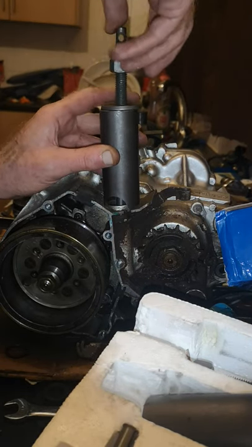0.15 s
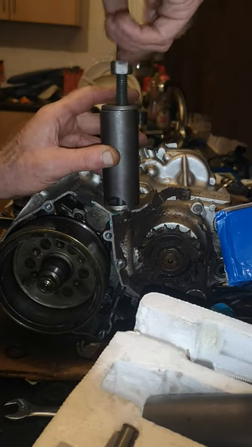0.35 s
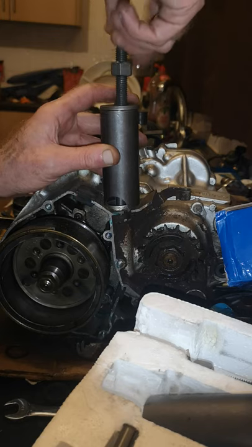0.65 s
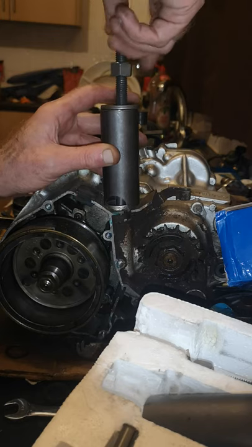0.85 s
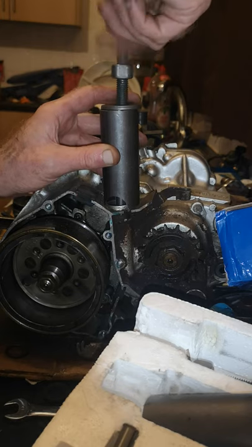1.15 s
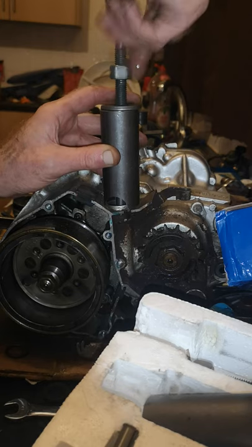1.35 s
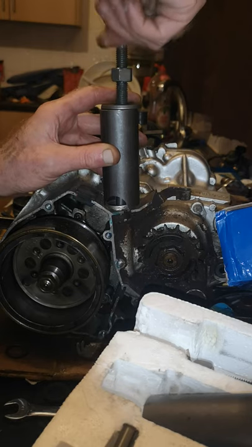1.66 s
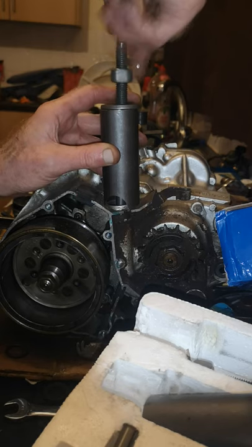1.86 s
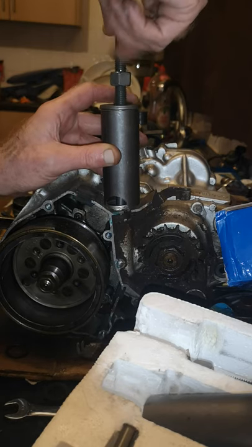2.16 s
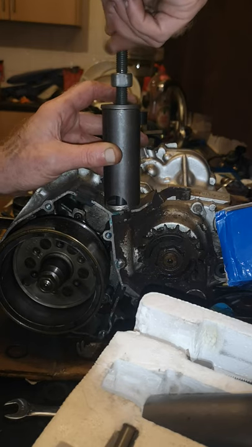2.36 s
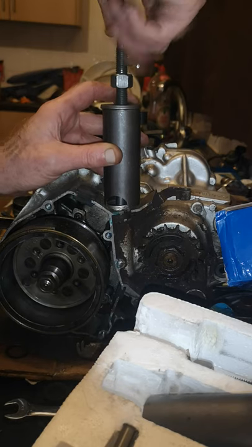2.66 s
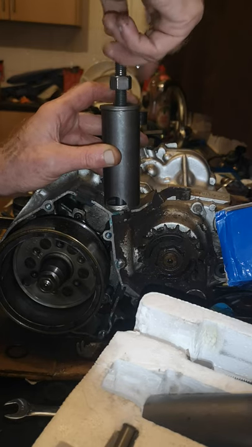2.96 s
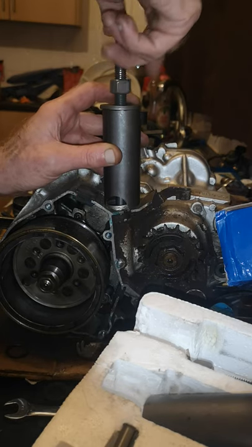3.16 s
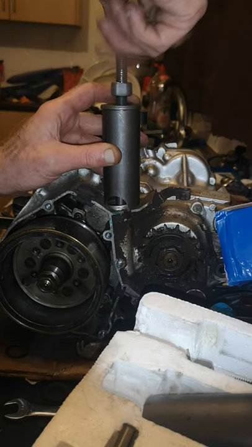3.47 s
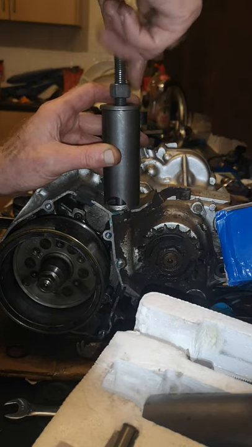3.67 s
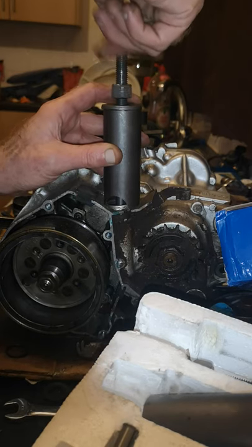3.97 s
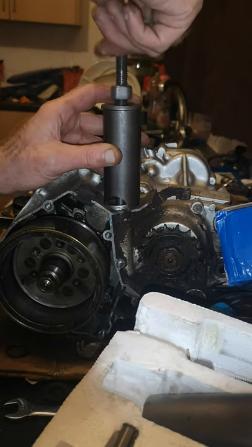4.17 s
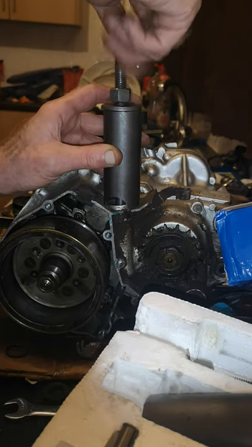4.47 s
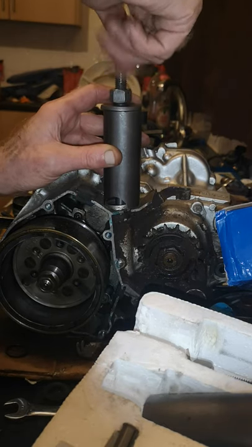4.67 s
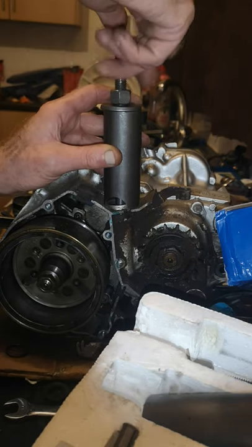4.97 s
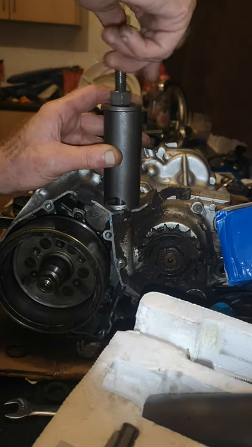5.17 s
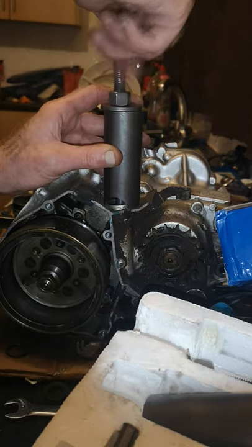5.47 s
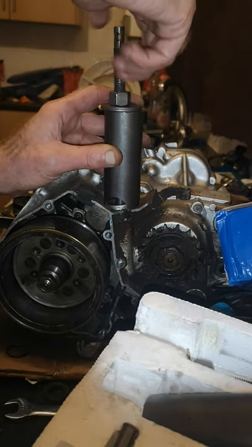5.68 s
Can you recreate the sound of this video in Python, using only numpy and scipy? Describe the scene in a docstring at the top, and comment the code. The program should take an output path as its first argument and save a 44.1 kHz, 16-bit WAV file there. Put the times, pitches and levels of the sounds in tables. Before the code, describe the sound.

Irregular bright metallic ticks, tiny rattles and short thread whirrs, with soft low thuds, in a small, faintly humming workshop.

```python
"""Bright steel knocks, rattles and whirrs on the right over a low rumble, in a small room with a faint hum:
a nut is flicked down the threaded bar of a puller that stands on an engine case in a workshop.
Contact forces made of tiny impacts excite resonances of nut, sleeve and bar; sliding thread whirrs.
Pushes of the hand shake bench and case as low resonances of noise; decaying noise makes the room's echo."""
import sys
import numpy as np
from scipy import signal
from scipy.fft import rfft, irfft, next_fast_len
from scipy.io import wavfile
from scipy.ndimage import uniform_filter1d

SR = 44100
rng = np.random.default_rng(int(sys.argv[2]) if len(sys.argv) > 2 else 0)


def transcribe(u):
    """Save the signal u as a 16-bit wav file named by the first command-line argument.

    u: samples, shape (n,) or (channels, n), limited to [-1, 1]; the rate is SR.
    q: integer samples, one column per channel.
    """
    v = np.clip(np.atleast_2d(u).T, -1, 1)
    q = np.round(v * 32767).astype(np.int16)
    wavfile.write(sys.argv[1], SR, q)


N = 256662
TIME = np.arange(N) / SR


def knocks(rise_s=0.00044, settle_s=0.0021, level_db=2):
    """Impact excitation: the nut meets a thread flank and settles in milliseconds of micro-bounces."""
    # knocks of the nut; the angle of the contact decides what rings; levels before the trims below
    # columns: start_s, click_db, then relative to the click: sleeve_db, bar_db, ping_db (of the nut)
    knock_table = [(0.1118, -50.5, -15, -19, -9), (0.1445, -29.5, -8, -18, 2),
                   (0.239, -41.5, -8, 1.5, -8.5), (0.6055, -47.5, -1.5, -2.5, -13),
                   (0.82, -37, -8, -8.5, 0.5), (1.034, -62.5, -1, 4, -17), (1.262, -51.5, -5, 5, -14),
                   (1.3024, -43, -6.5, -26, -2.5), (1.483, -36.5, -27, -12, -2),
                   (1.5093, -38, -4.5, -7, -8), (1.7223, -24, -37, -5.5, -4), (1.8731, -45.5, -3, -24, -4),
                   (1.9714, -30, -12, -4.5, -8), (2.024, -36, -22, -10, -11), (2.049, -32, -19, 1.5, -6),
                   (2.203, -41.5, -1.5, 0.5, -17), (2.4308, -40.5, -5.5, -2, -9),
                   (2.505, -43, -6, -4, -10.5), (2.7015, -41, -15, -23, -16), (2.7255, -39, -32, -15, -9),
                   (2.911, -45.5, -8, -8, -9), (2.926, -29.5, -17, -20, -11), (2.938, -32, -2, -5.5, -7),
                   (3.1428, -52.5, -3, 3, -23), (3.1775, -32, -6, -26, -4.5), (3.272, -48.5, -23, -7, -11),
                   (3.2832, -45.5, -12, 0, -23), (3.3876, -43.5, 3, -5, -10), (3.5826, -43, -18, -21, -18),
                   (3.6032, -40.5, -7, -15, -1.5), (3.8387, -32.5, -6.5, -6.5, -3),
                   (4.0379, -35.5, -12.5, -6.5, -11), (4.0586, -32.5, -9, -7.5, -13),
                   (4.0744, -40, -2, -11, -3), (4.2944, -32.5, -6.5, -18, -9.5), (4.4963, -49, -6, -6, -9),
                   (4.7426, -44, -0.5, -5.5, -9), (4.9254, -48.5, -7, -2.5, -21),
                   (5.176, -44.5, -2.5, -8, -6), (5.2014, -38, -3, -12, -5), (5.3745, -44, -19, -0.5, -15),
                   (5.5844, -37.5, -14.5, -7, -11), (5.6372, -42, -3, -7, -4.5),
                   (5.743, -56, 2.5, 3.5, -14)]
    sleeve_trim_db, bar_trim_db, ping_trim_db, crack_db = 2, 1, 2, -34
    out, t = np.zeros(N), TIME[:SR // 8]
    pressure = (1 - np.exp(-t / rise_s)) * np.exp(-t / settle_s)
    for start_s, click_db, sleeve_db, bar_db, ping_db in knock_table:
        force = grains(len(t), per_s=12000, spread_db=3) * pressure
        shares_db = np.array([0, sleeve_db + sleeve_trim_db, bar_db + bar_trim_db,
                              ping_db + ping_trim_db, crack_db])
        add(out, start_s, steel(force, click_db + shares_db, seconds=0.00037))
    return from_db(level_db) * out


def rattles(bar_db=-4, ping_db=-9, crack_db=-27, level_db=4):
    """Stick-slip chatter: under the finger the nut slips every few milliseconds in a swelling, fading run."""
    # chatter on the thread; levels before level_db, half length as the deviation of a bell curve
    # columns: centre_s, half_length_s, click_db, sleeve_db (relative to the click)
    rattle_table = [(0.457, 0.027, -54.5, -3), (1.085, 0.012, -61.5, -14), (1.129, 0.011, -49, -11),
                    (1.307, .007, -59, -7), (1.527, .004, -53.5, 7), (1.557, 0.0057, -45, -10),
                    (1.772, .004, -30, -14.5), (2.056, 0.0086, -36.5, -10), (2.265, 0.013, -40, -8.5),
                    (2.484, 0.031, -57.5, 1.5), (2.675, 0.007, -68.5, 6.5), (2.711, 0.0094, -58.5, 10),
                    (2.933, .003, -52.5, 1.5), (3.173, 0.021, -61, 2), (3.296, 0.0089, -57, -0.5),
                    (3.402, 0.027, -58, 0), (3.663, 0.0088, -48, -3.5), (3.815, 0.0058, -63.5, 0),
                    (4.295, 0.0098, -55, 4), (4.541, 0.013, -61, 5.5), (4.588, 0.0031, -67.5, 12.5),
                    (4.713, 0.009, -62, 3), (4.956, 0.019, -57.5, 2), (5.16, 0.012, -66.5, 1),
                    (5.207, 0.007, -47.5, -6), (5.395, 0.0058, -73, 8.5), (5.61, .008, -56.5, 6.5)]
    out, t = np.zeros(N), TIME[:SR // 4]
    middle = t[-1] / 2
    for centre_s, half_s, click_db, sleeve_db in rattle_table:
        slips = np.cumsum(rng.uniform(.002, .009, 128)) - .01
        since_slip = t - slips[np.searchsorted(slips, t) - 1]
        swell = np.exp(-((t - middle) / half_s) ** 2 / 2)
        pressure = (.15 + np.exp(-since_slip / .0015)) * swell
        force = grains(len(t), per_s=5000, spread_db=0.0) * pressure
        shares_db = np.array([0, sleeve_db, bar_db, ping_db, crack_db])
        add(out, centre_s - middle, steel(force, click_db + shares_db, seconds=0.0069))
    return from_db(level_db) * out


def steel(force, levels_db, seconds, contact_hz=12400):
    """Modal excitation: one contact rings each group of modes to its own level; the grip detunes them."""
    # resonances of the steel parts before detuning; columns: pitch_hz, width_hz, level_db (within its group)
    click_modes = [(5240, 1220, -6.5), (6107, 263, 1.5), (6430, 104, 1.5), (7126, 470, -3.5),
                   (7850, 310, -1.5), (9400, 2900, -7.5), (10020, 250, -4), (11760, 93, -8.5)]
    # the sleeve; columns: pitch_hz, width_hz, level_db
    sleeve_modes = [(384, 250, -23.5), (750, 193, -14.5), (1080, 130, -11.5), (2244, 253, 0.5),
                    (2686, 330, 1), (2988, 350, -1.5), (4200, 680, -13.5), (4658, 37, 2.5)]
    # the threaded bar; columns: pitch_hz, width_hz, level_db
    bar_modes = [(4670, 26, -14.5), (5230, 140, -27), (5615, 182, -3), (5774, 95, 3.5), (5808, 118, -3)]
    # the ping of the nut; columns: pitch_hz, width_hz, level_db
    ping_modes = [(10810, 370, 0), (11180, 180, -4.5)]
    # the faint crack on top; columns: pitch_hz, width_hz, level_db
    crack_modes = [(12600, 700, 16), (14600, 530, -3)]
    groups = (click_modes, sleeve_modes, bar_modes, ping_modes, crack_modes)
    force = signal.sosfilt(signal.butter(6, contact_hz, fs=SR, output="sos"), force)
    detune = np.array([rng.uniform(.996, 1.004), 1, 1])   # pitch only
    parts = [resonate(force, detune * modes) for modes in groups]
    parts[-1] = signal.sosfilt(signal.butter(4, 12500, "high", fs=SR, output="sos"), parts[-1])
    # each level is the peak of a running rms
    return sum(from_db(db) * part / envelope(part, seconds).max() for part, db in zip(parts, levels_db))


def whirr(wobble_hz=45, glint_db=5):
    """Sliding friction: thread grit excites the free nut's modes, each flaring separately as it wobbles."""
    # free runs of the nut, bell-shaped in time; columns: centre_s, half_length_s, level_db
    run_table = [(0.174, 0.03, -47.5), (0.421, 0.015, -49.5), (0.56, 0.044, -61.5), (0.779, 0.027, -58),
                 (0.893, 0.019, -56), (1.094, 0.019, -56), (1.179, 0.011, -60), (1.766, 0.016, -46.5),
                 (1.869, 0.0066, -50.5), (1.997, 0.014, -46.5), (2.187, 0.0086, -48.5),
                 (2.23, 0.0055, -45.5), (2.405, 0.003, -58), (3.23, 0.009, -56)]
    # resonances of the free nut on its thread; columns: pitch_hz, width_hz, level_db
    thread_modes = [(1285, 440, -11), (2240, 220, -1.5), (2813, 120, 7), (3040, 130, -11),
                    (5600, 160, -5.5), (6140, 120, -16), (6600, 320, -24), (8000, 1400, -12.5),
                    (9730, 130, -9), (11300, 210, -9)]
    speed = sum(from_db(db) * np.exp(-((TIME - s) / half) ** 2 / 2) for s, half, db in run_table)
    grit = grains(N, per_s=800, spread_db=5)
    friction = 0
    for points in rng.standard_normal((len(thread_modes), SR // 20)):
        pass_index = 0 if np.isscalar(friction) else pass_index + 1
        wobble = np.interp(TIME * wobble_hz, np.arange(len(points)), points)
        friction = friction + resonate(grit * from_db(glint_db * wobble), [thread_modes[pass_index]])
    friction = signal.sosfilt(signal.butter(8, 12000, fs=SR, output="sos"), friction)
    return speed * friction / envelope(friction, 0.72)


def clanks():
    """Structure-borne impulse: a firmer flick passes down the puller and sets the engine case ringing."""
    # firmer flicks; columns: start_s, peak_db
    clank_table = [(1.768, -67), (2.708, -45), (2.938, -57), (3.178, -50.5), (4.06, -72)]
    # ringing of the engine case; columns: pitch_hz, width_hz, level_db
    ring_modes = [(750, 140, -12.5), (1004, 36, 7), (1200, 52, -1)]
    out, blow = np.zeros(N), resonate(signal.unit_impulse(SR // 4), ring_modes)
    for start_s, peak_db in clank_table:
        add(out, start_s, from_db(peak_db) * blow / np.abs(blow).max())
    return out


def thumps(hz=410, width_hz=210, decay_s=0.0068):
    """Damped resonance: a short, woolly burst of contact noise passes twice through one broad, low mode."""
    # a finger hits the nut squarely and the whole puller thumps on the case; columns: start_s, peak_db
    thump_table = [(1.723, -56), (1.771, -51), (1.972, -53), (2.205, -56.5), (2.69, -59), (4.039, -55)]
    out, t = np.zeros(N), TIME[:SR // 8]
    mode = [(hz, width_hz, 0)]
    for start_s, peak_db in thump_table:
        burst = rng.standard_normal(len(t)) * np.exp(-t / decay_s)
        thump = resonate(resonate(burst, mode), mode)
        add(out, start_s, from_db(peak_db) * thump / np.abs(thump).max())
    return out


def thuds(base_hz=172, width_hz=52, level_db=-1):
    """Soft impact: flesh rounds the attack and the case swings a few times, its pitch shifting with the grip."""
    # a fingertip lands on the bar and the case gives one round thud
    # columns: start_s, peak_db (before level_db)
    thud_table = [(0.117, -48), (0.468, -44.5), (1.306, -39), (1.548, -36.5), (1.781, -36), (1.974, -37.5),
                  (2.053, -38), (2.958, -43.5), (3.144, -42.5), (3.189, -44), (4.075, -39), (5.206, -36.5),
                  (5.388, -39)]
    out = np.zeros(N)
    for start_s, peak_db in thud_table:
        mode = [(base_hz * rng.uniform(0.939, 0.98), width_hz, 0)]
        swing = resonate(resonate(signal.unit_impulse(SR // 8), mode), mode)
        add(out, start_s, from_db(peak_db + level_db) * swing / np.abs(swing).max())
    return out


def handling(thud_side_db=-15, bench_lag_s=0.0081, right_lag_s=.0009):
    """Forced vibration: the hand rocks the bench and thuds on the case, heard first on the left."""
    # pushes of the hand; columns: start_s, hold_s, bench_rumble_db, case_thud_db
    push_table = [(0.006, 0.024, -48, -60), (0.111, 0.041, -35, -54), (0.232, 0.01, -54, -49.5),
                  (0.463, 0.021, -33.5, -52.5), (0.604, 0.019, -47, -58.5), (0.826, 0.01, -39.5, -54.5),
                  (0.925, 0.0082, -48, -58), (1.119, 0.034, -39.5, -52), (1.263, 0.073, -43, -52.5),
                  (1.394, 0.16, -43.5, -55), (1.544, 0.018, -29, -44), (1.618, 0.03, -35.5, -64),
                  (1.724, 0.098, -29.5, -46.5), (1.92, 0.032, -30.5, -58), (1.984, 0.08, -34.5, -48),
                  (2.198, 0.088, -39.5, -48), (2.457, 0.11, -35, -55), (2.684, 0.064, -33, -54),
                  (2.902, 0.045, -33, -50), (3.137, 0.057, -38.5, -51.5), (3.369, 0.057, -36, -48.5),
                  (3.598, 0.095, -48, -55.5), (3.825, 0.097, -31.5, -56), (4.044, 0.041, -35.5, -47),
                  (4.268, 0.065, -37.5, -49), (4.505, 0.054, -35.5, -52), (4.686, 0.061, -39.5, -51.5),
                  (4.928, 0.032, -40.5, -49.5), (5.165, 0.059, -39.5, -52.5), (5.391, 0.012, -42, -51.5),
                  (5.597, 0.081, -37, -54)]
    # slow rocking of the whole bench; columns: time_s, level_db
    rock_curve = [(0.0, -35.5), (0.11, -38), (1.15, -51), (1.93, -26), (2.24, -25.5), (2.48, -48.5),
                  (2.72, -33), (3.47, -38), (3.55, -63.5), (3.86, -35), (4.9, -32), (5.07, -49.5),
                  (5.22, -34.5), (5.82, -69)]
    # resonances of that rocking; columns: pitch_hz, width_hz, level_db
    rock_modes = [(15.93, 1.28, 4.5), (28.7, 5.9, -18)]
    # resonances of the bench; columns: pitch_hz, width_hz, level_db
    bench_modes = [(32.5, 12, -10.5), (46.8, 6.3, -1.5), (55.7, 20.2, -14.5)]
    # dull resonances of the engine case; columns: pitch_hz, width_hz, level_db
    case_modes = [(93, 32, -2), (130.5, 32.2, 3), (172.2, 24.6, 0.5), (200.3, 23.8, -2.5), (343, 74, -18),
                  (426, 100, -19), (685, 280, -21)]
    start_s, hold_s, bench_db, thud_db = np.transpose(push_table)
    # the light case answers a push at once; the heavy bench follows it and swings on longer
    bench_db = pushed(start_s + bench_lag_s, hold_s, bench_db,
                      rise_db_per_s=777, fall_db_per_s=127, rest_db=-58.5)
    thud_db = pushed(start_s, hold_s, thud_db, rise_db_per_s=604, fall_db_per_s=194, rest_db=-72)
    rock_db = np.interp(TIME, *np.transpose(rock_curve))
    rock = rumble(rock_modes, rock_db, even_s=0.11, top_hz=22.6)
    bench = rumble(bench_modes, bench_db, even_s=0.041, top_hz=80)
    thud = rumble(case_modes, thud_db, even_s=0.065, top_hz=875)
    scattered = rumble(case_modes, thud_db + thud_side_db, even_s=0.065, top_hz=875)
    common = rock + bench + thud + thuds()
    # opposite signs of the scattered part widen the sound
    return np.array([common + scattered, late(common - scattered, right_lag_s)])


def pushed(starts, holds, levels_db, rise_db_per_s, fall_db_per_s, rest_db):
    """Power summation: pushes rise to their start, hold and die away over the tremor of the resting hand."""
    power = from_db(rest_db) ** 2
    for start, hold, db in zip(starts, holds, levels_db):
        before = np.maximum(start - TIME, 0)
        after = np.maximum(TIME - start - hold, 0)
        power = power + from_db(db - rise_db_per_s * before - fall_db_per_s * after) ** 2
    return 10 * np.log10(power)


def rumble(modes, level_db, even_s, top_hz):
    """Random excitation: noise stirs heavy, dull modes, evened out and then as loud as the hand pushes."""
    body = resonate(rng.standard_normal(N + SR), modes)
    body = signal.sosfilt(signal.butter(2, top_hz, fs=SR, output="sos"), body)
    strength = envelope(np.abs(signal.hilbert(body)), even_s) / np.sqrt(2)
    steady = (body / strength)[SR // 2:SR // 2 + N]   # leaves out both ends
    return from_db(level_db) * steady


def room(x, turn_hz=0.6964):
    """Changing paths: the moving hand passes the sound in turn through three echoes of constant total power."""
    angles = 2 * np.pi * turn_hz * TIME + np.pi / 3 * np.arange(3)[:, None]
    shares = np.sqrt(2 / 3) * np.cos(angles)
    return sum(echo(x * share) for share in shares)


def echo(x, first_s=0.0009, split_hz=4500, t60_s=0.31, treble_t60_s=0.22, level_db=-5):
    """Diffuse reverberation: it builds up after the nearest surfaces answer; the treble dies sooner."""
    t, noise = TIME[:SR * 2 // 3], rng.standard_normal(SR * 2 // 3)
    low = signal.sosfiltfilt(signal.butter(2, split_hz, fs=SR, output="sos"), noise)
    tail = low * from_db(-60 * t / t60_s) + (noise - low) * from_db(-60 * t / treble_t60_s)
    tail = tail * (1 - np.exp(-(t / first_s) ** 2))
    tail = tail / np.sqrt(np.sum(tail ** 2))   # unit energy
    return from_db(level_db) * signal.fftconvolve(x, tail)[:N]


def workshop(shared_hz=900, air_db=-30):
    """Partly coherent noise: room air alike on both sides in the bass, mains hum, thin electric whine on the left."""
    # spectrum of the still air on the left, before air_db; columns: frequency_hz, level_db
    left_curve = [(25, -20), (50, -13), (80, -17.5), (170, -14.5), (300, -22.5), (480, -28), (750, -14),
                  (1080, -16), (1400, -28), (1750, -17.5), (2300, -26.5), (3500, -35.5), (6000, -43.5),
                  (10000, -48), (15000, -46.5)]
    # the same on the right; columns: frequency_hz, level_db
    right_curve = [(25, -12), (50, -9), (80, -19.5), (170, -15), (300, -25), (480, -30.5), (750, -21),
                   (1080, -28), (1400, -31.5), (1750, -25.5), (2300, -36.5), (3500, -39), (6000, -44),
                   (10000, -46), (15000, -49)]
    hum_hz, hum_db, whine_hz, whine_db = 101.5, -62, 7700, -83.5   # rms levels
    low_pass = signal.butter(1, shared_hz, fs=SR, output="sos")
    high_pass = signal.butter(1, shared_hz, "high", fs=SR, output="sos")
    shared = signal.sosfilt(low_pass, rng.standard_normal(N))
    air = shared + signal.sosfilt(high_pass, rng.standard_normal((2, N)))
    hum = from_db(hum_db) * np.sqrt(2) * np.sin(2 * np.pi * hum_hz * TIME)
    whine = from_db(whine_db) * np.sqrt(2) * np.sin(2 * np.pi * whine_hz * TIME)
    left = from_db(air_db) * colour(air[0], left_curve) + whine
    right = from_db(air_db) * colour(air[1], right_curve)
    return np.array([left, right]) + hum


def from_db(db):
    """Logarithmic level: decibels to amplitude gain."""
    return 10 ** (np.asarray(db) / 20)


def envelope(x, seconds):
    """Short-time power: running rms."""
    return np.sqrt(np.abs(uniform_filter1d(x * x, max(int(seconds * SR), 1))) + 1e-20)


def colour(x, points):
    """Spectral shaping: filter by a curve of (frequency_hz, level_db), joined along log frequency."""
    hz, db = np.transpose(points)
    size = next_fast_len(N + 4096)
    bins = np.maximum(np.arange(size // 2 + 1) * SR / size, 1)
    gain = from_db(np.interp(np.log(bins), np.log(hz), db))
    return irfft(rfft(x, size) * gain, size)[..., :N]


def resonate(force, modes):
    """Modal synthesis: parallel damped resonances of alternating sign."""
    out = 0
    for k, (hz, width, db) in enumerate(modes):
        r = np.exp(-np.pi * width / SR)
        poles = [1, -2 * r * np.cos(2 * np.pi * hz / SR), r * r]
        gain = (-1) ** k * from_db(db) * (1 - r * r) / 2
        out = out + gain * signal.lfilter([1, 0, -1], poles, force + 1e-18)
    return out


def grains(size, per_s, spread_db):
    """Random pulse train: tiny impacts of either sign at random moments, their strengths spread in dB."""
    hits = rng.random(size) < per_s / SR
    return hits * rng.choice([-1, 1], size) * from_db(spread_db * rng.standard_normal(size))


def add(track, start, sound):
    """Superposition: mix a sound in at a given time."""
    at = max(round(start * SR), 0)
    track[at:at + len(sound)] += sound[:N - at]


def late(x, seconds):
    """Propagation delay: the same sound a little later."""
    return np.interp(TIME - seconds, TIME, x)


def scene(left_lag_s=.000567):
    """Interaural cues: bright steel mostly on the right, rumble near the middle, the room all round."""
    # the tool stands to the right: its direct sound on the left; columns: frequency_hz, level_db
    shadow_curve = [(500, 7), (1100, -3), (2300, -9.5), (3200, -38), (3950, -0.5), (4700, -15.5),
                    (5700, -28), (6400, -25), (8000, -29), (11000, -31), (15000, -20)]
    # colour of the room's echo on the left; columns: frequency_hz, level_db
    echo_left_curve = [(500, 3.5), (1100, 8), (2300, -3.5), (3900, -6), (5700, -18), (8000, -22),
                       (11000, -30), (15000, -15.5)]
    # colour of the room's echo on the right; columns: frequency_hz, level_db
    echo_right_curve = [(500, -5.5), (1100, 11), (2300, 0.5), (3900, 4), (5700, 0), (8000, 0.5),
                        (11000, 0.5), (15000, -3)]
    tool = knocks() + rattles() + whirr() + clanks() + thumps()
    air_left, air_right = workshop()
    left = colour(tool, shadow_curve) + colour(room(tool), echo_left_curve) + air_left
    right = tool + colour(room(tool), echo_right_curve) + air_right
    return np.array([late(left, left_lag_s), right]) + handling()


def record(dry, cutoff_hz=15500):
    """Band limiting: a steep low-pass cuts the top."""
    return signal.sosfilt(signal.ellip(10, .1, 90, cutoff_hz, fs=SR, output="sos"), dry)


dry = scene()
out = record(dry)
transcribe(out)
```